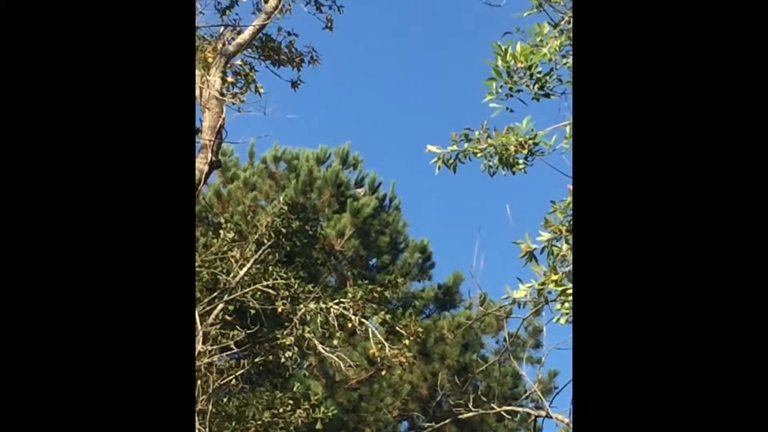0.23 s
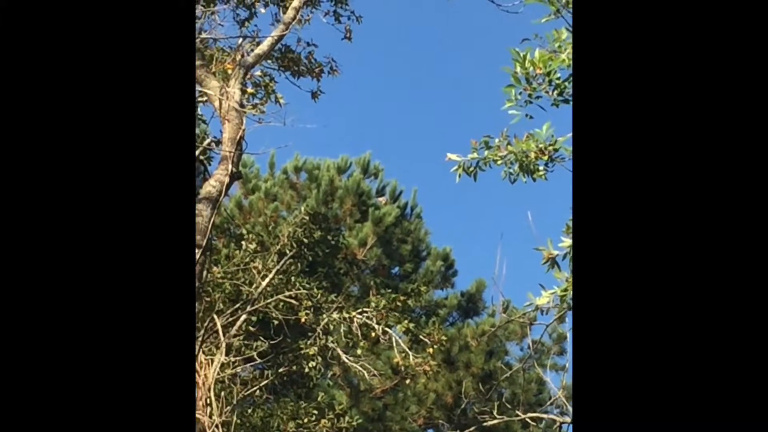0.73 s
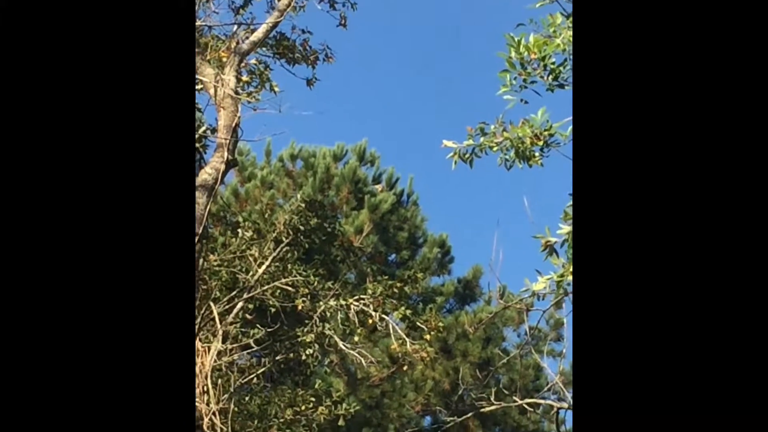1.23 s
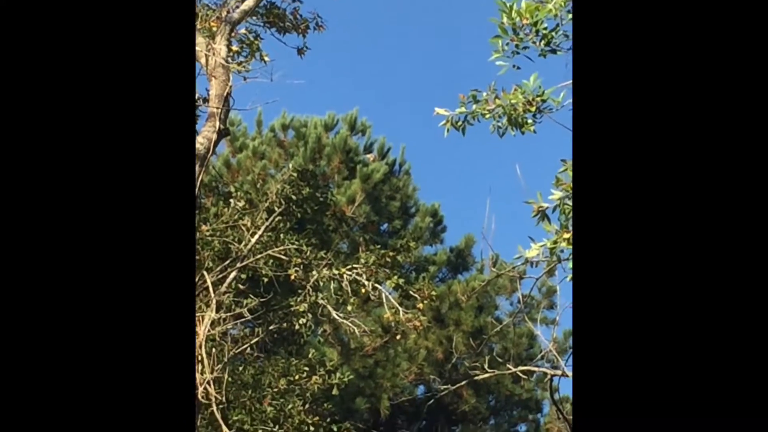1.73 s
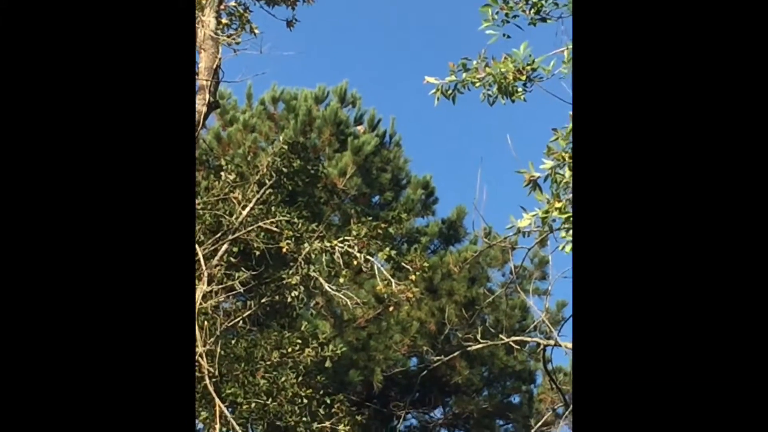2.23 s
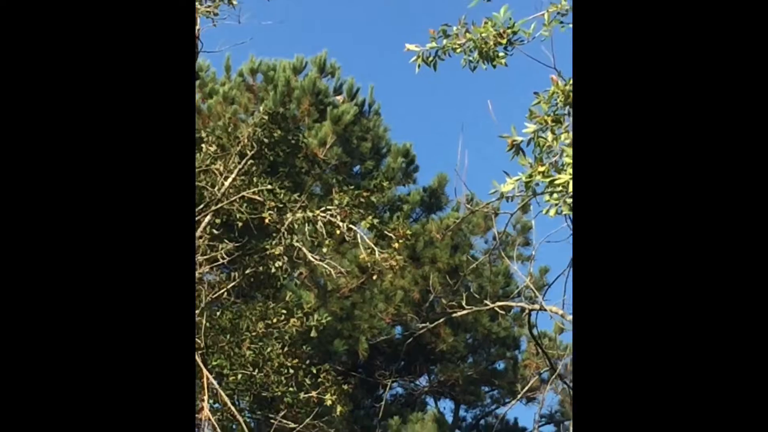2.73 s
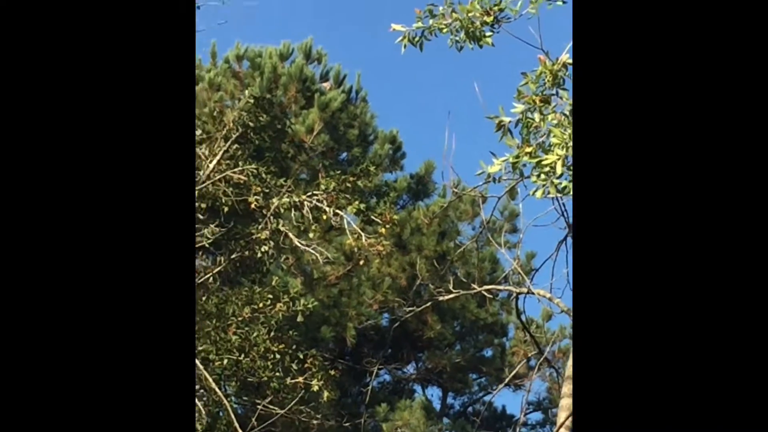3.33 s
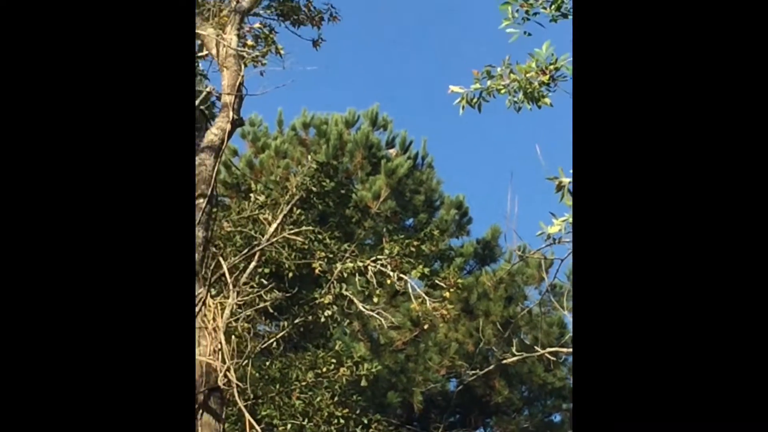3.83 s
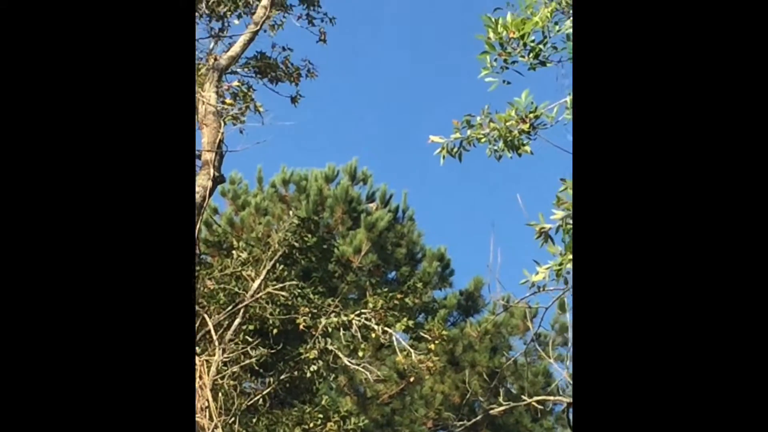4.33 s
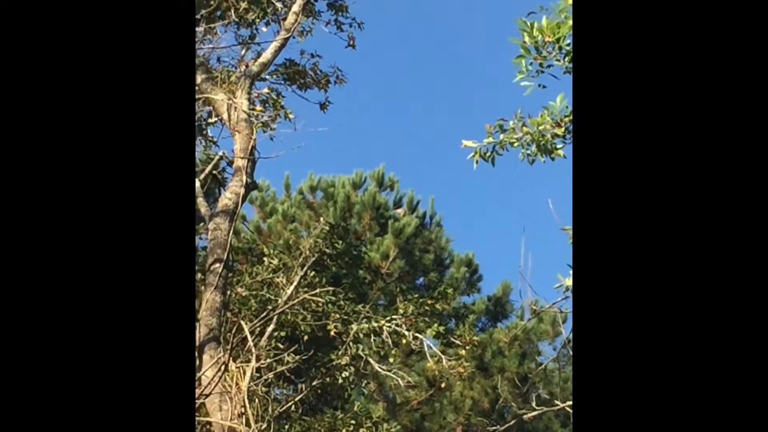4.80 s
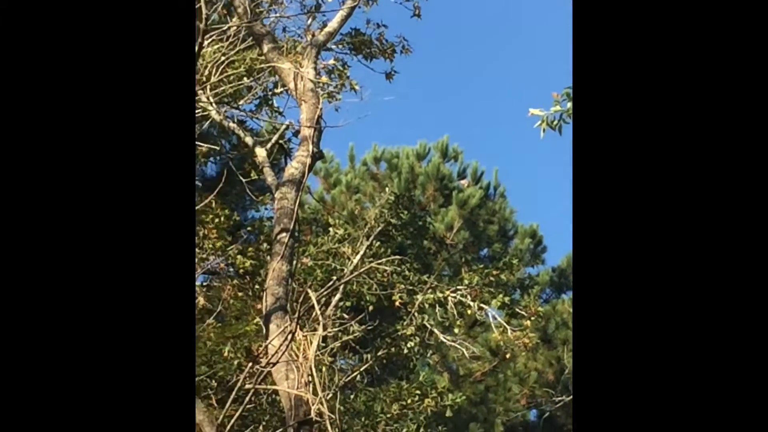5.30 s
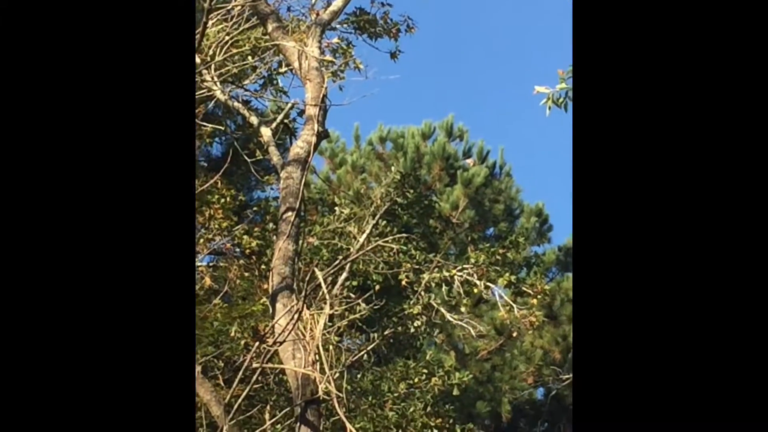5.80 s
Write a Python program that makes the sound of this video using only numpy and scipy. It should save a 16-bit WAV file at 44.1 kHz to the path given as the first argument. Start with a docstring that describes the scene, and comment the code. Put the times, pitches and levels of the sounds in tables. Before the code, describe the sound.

Loud, nasal, hoarse bird screams repeat at roughly two-thirds-second intervals, then more widely spaced near the end, eight in all. Some break suddenly from a higher to a lower pitch. Echoes scatter through the woods between calls, and distant calls of the same kind reply weakly. Close at the microphone are low wind-like rumble, muffled handling thuds from the middle on, and tiny metallic ticks over constant quiet outdoor air.

```python
"""Blue jay jeering from a tree

A blue jay jeers eight times: harmonics scoop up, step down, sag and drop away, some with a break in pitch.
Reflections and scattered echoes from trunks and foliage colour the calls; other jays answer from far off.
Behind them is steady outdoor noise. Close to the hand-held microphone: low rumble and finger rubs of
shaped noise, soft bumps of decaying sines and a faint two-mode tick once a second."""
import sys
import numpy as np
from scipy import signal
from scipy.fft import rfft, irfft
from scipy.io import wavfile
from scipy.ndimage import uniform_filter1d, map_coordinates

SR = 44100
rng = np.random.default_rng(int(sys.argv[2]) if len(sys.argv) > 2 else 0)


def digitize_waveform(pressure):
    """Quantize a signal to 16-bit integers and store it at the path in sys.argv[1].

    Rows of a 2-D input are taken as channels; values are limited to [-1, 1].
    """
    field = np.atleast_2d(pressure).T
    bounded = np.clip(field, -1, 1)
    quanta = np.round(bounded * 32767).astype(np.int16)
    wavfile.write(sys.argv[1], SR, quanta)


N = 267069


def undb(db):
    """Decibels to gain."""
    return 10 ** (np.asarray(db) / 20)


def unit(x):
    """Scale to rms 1."""
    return x / np.sqrt(np.mean(x ** 2))


def curves(table, x):
    """Columns of a table interpolated at x, which runs along its first column."""
    knots, *columns = np.transpose(table)
    return [np.interp(x, knots, column) for column in columns]


def response(points, hz):
    """Gain of a (frequency [Hz], level [dB]) spectrum, interpolated over log frequency."""
    knots_hz, db = np.transpose(points)
    return undb(np.interp(np.log(np.maximum(hz, 1)), np.log(knots_hz), db))


def band(x, lo_hz, hi_hz, order=2):
    """Butterworth band-pass."""
    sos = signal.butter(order, [lo_hz, min(hi_hz, SR / 2 - 1)], "band", fs=SR, output="sos")
    return signal.sosfilt(sos, x)


def noise(points):
    """Gaussian noise of a given spectrum, rms 1."""
    hz = np.arange(N // 2 + 1) * SR / N
    return unit(irfft(rfft(rng.standard_normal(N)) * response(points, hz), N))


def wander(rate_hz):
    """Smooth random motion, mostly below rate_hz, rms 1."""
    hz = np.arange(N // 2 + 1) * SR / N
    return unit(irfft(rfft(rng.standard_normal(N)) / (1 + (hz / rate_hz) ** 2), N))


def add(out, start_s, x):
    """Mix x into out from a start time."""
    i = max(int(start_s * SR), 0)
    out[i:i + len(x)] += x[:len(out) - i]


def air():
    """Outdoor background: shaped noise at a nearly constant level."""
    # noise spectrum: (frequency [Hz], relative level per Hz [dB])
    air_spectrum = [(25, -25), (60, 3), (90, -2), (250, -14.5), (630, -24.5), (1000, -21.5), (2000, -21.5),
                    (2800, -29), (3900, -36.5), (5300, -35), (8000, -41), (10400, -43), (12000, -44),
                    (15500, -45.5)]
    return noise(air_spectrum) * undb(-55.5 + 0.14 * wander(0.59))


def rubbing():
    """Strength of the rubbing: a steady grip plus a swell each time the fingers shift."""
    grip_db = -68  # relative, as the swells
    # finger shifts on the case: (centre [s], length [s], relative peak level [dB])
    shifts = [(0.514, 0.047, -55), (2.394, 0.085, -51), (2.524, 0.13, -49.5), (2.977, 0.069, -52.5),
              (3.499, 0.047, -40.5), (3.628, 0.06, -45), (3.807, 0.13, -52), (3.86, 0.013, -43),
              (4.05, 0.088, -54.5), (4.647, 0.03, -45.5), (5.2, 0.054, -49), (5.304, 0.056, -51.5),
              (5.736, 0.064, -49), (5.84, 0.072, -46.5)]
    t = np.arange(N) / SR
    strength = undb(grip_db)
    for centre_s, length_s, db in shifts:
        strength = strength + undb(db) * np.exp(-(2 * (t - centre_s) / length_s) ** 2)
    return strength


def bumps():
    """Soft bumps: each sine swells and dies within about two swings of the microphone's body."""
    # bumps of the hand: (start [s], envelope peak [dB], pitch [Hz])
    hits = [(3.352, -33.5, 99), (3.466, -32, 95), (3.635, -34.5, 72.5), (3.744, -35, 126), (3.86, -33, 232),
            (3.897, -30.5, 100.8), (4.893, -30.5, 82), (4.947, -32.5, 66), (5.036, -33, 75),
            (5.204, -32, 82), (5.744, -30, 86), (5.852, -30.5, 95.5)]
    out, t = np.zeros(N), np.arange(SR // 10) / SR
    for start_s, db, hz in hits:
        swell = t * hz / 0.5  # envelope peaks after half a cycle
        envelope = swell ** 2 * np.exp(2 * (1 - swell))
        add(out, start_s, undb(db) * envelope * np.sin(2 * np.pi * hz * t))
    return out


def handling():
    """Uneven low rumble of air, the rub of fingers on the case and bumps of the hand."""
    # rumble at the microphone: (time [s], relative level [dB])
    rumble_levels = [(0.0, -50), (0.8, -52.5), (1.6, -51.5), (2.6, -49.5), (3.15, -51.5), (3.4, -44),
                     (4.0, -45.5), (4.45, -49), (5.2, -47), (6.05, -54)]
    rumble_db, = curves(rumble_levels, np.arange(N) / SR)
    rumble = noise([(25, -38.5), (45, -7), (70, 0), (120, -2.5), (170, -10.5), (260, -11.5), (400, -28.5),
                    (800, -73)])
    rumble = rumble * undb(rumble_db - 2.0 + 3.96 * wander(5.6))
    rub = noise([(150, -39.0), (300, 4.0), (540, 11.5), (640, -5.5), (800, -6.5), (2000, -74.0)])
    rub = rub * rubbing() * undb(-8.0 + 3.25 * wander(44))
    return rumble + rub + bumps()


def ticks(ring_hz=7900, decay_s=0.0003, upper_hz=13500, upper_db=-19):
    """Tiny metal clicks, as of a wristwatch: two modes under one very short envelope."""
    # ticks: (start [s], envelope peak [dB])
    clicks = [(0.102, -48), (1.105, -46), (2.1082, -45), (3.1118, -47), (4.115, -47.5), (5.118, -46)]
    out, t = np.zeros(N), np.arange(SR // 100) / SR
    ring = np.sin(2 * np.pi * ring_hz * t) + undb(upper_db) * np.sin(2 * np.pi * upper_hz * t)
    envelope = t / decay_s * np.exp(1 - t / decay_s)
    for start_s, db in clicks:
        add(out, start_s, undb(db) * ring * envelope)
    return out


def jay(calls, jitter=0.0022, scoop_jitter=.036, scoop_s=0.044, shimmer_db=0.65, flutter_db=2.5,
        third_flutter_db=1.5, hiss_db=-39, scoop_hiss_db=-5, hiss_fade_s=.022, attack_s=0.022,
        release_s=0.0023, waver=0.0023, fundamental_db=-2.5, count=10):
    """Syrinx: harmonics slide through the throat resonances, hoarse until the voice settles.

    Rows of a call: (time [s], pitch [Hz], level, third harmonic, higher overtones [relative dB])."""
    # throat and open beak: (frequency [Hz], relative level [dB])
    throat = [(600, -30), (900, -14.5), (1250, -16.5), (1450, -8.5), (1800, -0.5), (2100, -2), (2600, -9.5),
              (2900, -4.5), (3200, -19.5), (3700, -37.5), (4900, -25.5), (6900, -31), (8300, -49.5),
              (12500, -57)]
    out = np.zeros(N)
    shake, shimmer, soft_noise = wander(350), wander(90), noise(throat)
    drift = waver * wander(22)
    flutter = np.array([wander(25) for _ in range(count)])
    k = np.arange(1, count + 1)[:, None]
    for call in calls:
        start_s, end_s = call[0][0], call[-1][0]
        i = np.arange(max(int((start_s - hiss_fade_s) * SR), 0), min(int(end_s * SR), N))
        t = i / SR
        age_s = t - start_s
        # the muscles need a few milliseconds, even at a break
        hz, db, third_db, edge_db = uniform_filter1d(np.array(curves(call, t)), size=SR // 220, axis=1)
        hoarse = np.exp(-(age_s / scoop_s) ** 2)

        # harmonic sizes relative to the second, which carries the call
        size = response(throat, k * hz) * undb(flutter_db * flutter[:, i])
        size = size / size[1]
        size[0] *= undb(fundamental_db)
        size[2] = undb(third_db + third_flutter_db * flutter[2, i])
        size[3:] *= undb(edge_db - 1) / np.linalg.norm(size[3:], axis=0)

        wobble = drift[i] + (jitter + scoop_jitter * hoarse) * shake[i]
        phase = 2 * np.pi * np.cumsum(hz * (1 + wobble)) / SR
        tone = np.sqrt(2) * (size * np.sin(k * phase)).sum(axis=0) * np.clip(age_s / attack_s, 0, 1)
        # soft noise fades in over hiss_fade_s ahead of the tone
        fade_in = np.clip(1 + age_s / hiss_fade_s, 0, 1)
        hiss = (undb(hiss_db) + undb(scoop_hiss_db) * hoarse) * soft_noise[i] * fade_in
        release = np.minimum((end_s - t) / release_s, 1)
        out[i] += (tone + hiss) * release * undb(db + shimmer_db * shimmer[i])
    return out


def woods(x, near_db, far_db, near_s=0.013, t60_s=0.68, branches_per_s=500, trunks_per_s=900):
    """Near branches return single quick echoes; further trunks return a long, dull tail of them."""
    # bands where the tail is stronger: (centre [Hz], width [Hz], gain of the added band [dB])
    lingering = [(1808, 90, 1.5), (2498, 220, 2.5)]
    t = np.arange(SR) / SR
    branches = rng.standard_normal(SR) * (rng.random(SR) < branches_per_s / SR)
    trunks = rng.standard_normal(SR) * (rng.random(SR) < trunks_per_s / SR)
    near = band(branches, 1100, 15000) * np.exp(-t / near_s) * np.minimum(t / 0.0017, 1)
    far = band(trunks, 630, 6400) * np.exp(-np.log(1000) * t / t60_s) * (1 - np.exp(-t / 0.0067))
    far = far + sum(undb(db) * band(far, hz - width_hz / 2, hz + width_hz / 2, order=1)
                    for hz, width_hz, db in lingering)
    middle = slice(1500, 2800)  # Hz; each path's rms gain here is set
    echoes = np.zeros(SR)
    for path, db in [(near, near_db), (far, far_db)]:
        echoes += undb(db) * path / np.sqrt(np.mean(abs(rfft(path)[middle]) ** 2))
    return x + signal.fftconvolve(x, echoes)[:N]


def answer(start_s, end_s, first_hz, last_hz, level_db):
    """Far call: only its loud middle carries, swelling and fading as it falls. Rows as for jay()."""
    end_fade_db, third_db, edge_db = -16.5, -35, -45
    u = np.linspace(0, 1, num=40)
    t = start_s + u * (end_s - start_s)
    hz = first_hz + u * (last_hz - first_hz)
    db = level_db + end_fade_db * (2 * u - 1) ** 2
    return np.column_stack(np.broadcast_arrays(t, hz, db, third_db, edge_db))


def far_jays():
    """Falling calls of distant jays, heard with strong echoes from the trees."""
    # calls: (start [s], end [s], first pitch [Hz], last pitch [Hz], relative level [dB])
    answers = [(1.81, 1.929, 1450, 1310, -51.5), (1.84, 1.922, 1075, 985, -55),
               (3.92, 4.0, 1335, 1260, -63), (5.831, 6.028, 1345, 1138, -51)]
    calls = jay([answer(*row) for row in answers], scoop_jitter=0.0098, scoop_hiss_db=-27.5)
    return woods(calls, near_db=0, far_db=-13.5)


def ground(x):
    """Close reflections add to the call and cancel it in turn, so sliding harmonics swell and fade."""
    # ground and close surfaces: (delay [ms], gain [linear])
    reflections = [(3.414, .08), (4.604, .12), (6.76, .09), (7.208, .39), (7.436, .38), (7.872, .11),
                   (15.339, .09)]
    return x + sum(gain * map_coordinates(x, [np.arange(N) - delay_ms * SR / 1000], order=1)
                   for delay_ms, gain in reflections)


def jeer(start_s, crest_s, step_at_s, end_s, step_s, crest_hz, before_hz, after_hz, last_hz, bow_hz,
         level_db, overtone_db):
    """Scoop to the high register, step to the low one, sag and drop. Rows as for jay()."""
    # voice against pitch: (pitch [Hz], second harmonic [relative dB],
    # third harmonic re second [dB], higher overtones re second [relative dB])
    voice = [(605, -62.5, 23.5, -12), (733, -52, 8, -7.5), (813, -42, -4, -20), (852, -39.5, -4, -33),
             (894, -43.5, -5.5, -22), (948, -38, -11, -27.5), (1031, -33, -28, -29),
             (1133, -35.5, -21.5, -20.5), (1360, -38, -35.5, -17)]
    scoop_hz, scoop_shape = 698.8, .88  # shape under 1 climbs fastest at first
    drop_s, drop_share, drop_shape = .06, .32, 2.2  # final fall by this share, ever faster
    scoop_edge_db, step_edge_db, break_s = 8.5, -8.5, 0.0077  # overtones flare in scoop, falter at step

    t = np.linspace(start_s, end_s, num=400)
    climb = np.clip((t - start_s) / (crest_s - start_s), 0, 1) ** scoop_shape
    stepped = .5 + .5 * np.tanh(2 * (t - step_at_s) / step_s)
    sag = np.clip((t - step_at_s) / (end_s - drop_s - step_at_s), 0, 1)
    drop = np.clip(1 - (end_s - t) / drop_s, 0, 1) ** drop_shape
    high_hz = np.interp(t, [crest_s, step_at_s], [crest_hz, before_hz])
    low_hz = after_hz + sag * (last_hz - after_hz) + bow_hz * np.sin(np.pi * sag)
    register_hz = high_hz + stepped * (low_hz - high_hz)
    hz = (scoop_hz + climb * (register_hz - scoop_hz)) * (1 - drop_share * drop)

    db, third_db, edge_db = curves(voice, hz)
    # gradual steps falter less
    falter = np.exp(-((t - step_at_s) / break_s) ** 2) * min(break_s / step_s, 1)
    edge_db = edge_db + overtone_db + scoop_edge_db * (1 - climb) + step_edge_db * falter
    return np.column_stack([t, hz, db + level_db, third_db, edge_db])


def near_jay():
    """The main jay: eight jeers with close reflections and echoes from the trees."""
    # jeers: (start [s], crest [s], step down [s], end [s], step length [s], pitch at crest [Hz],
    # before step [Hz], after step [Hz], before final drop [Hz], upward bow of the sag [Hz],
    # relative level [dB], relative overtone level [dB])
    jeers = [(-0.035, 0.018, 0.102, 0.399, .003, 1254, 1218, 964, 856, -10, 0, 0),
             (0.587, 0.642, 0.688, 1.003, .025, 1122, 1095, 1016, 873, 3, 0, 1),
             (1.221, 1.279, 1.328, 1.641, .03, 1150, 1108, 1046, 915, 4, 0, 0),
             (1.929, 1.99, 2.053, 2.374, .04, 1178, 1140, 1058, 893, -3, 1, -1),
             (2.578, 2.643, 2.745, 3.018, .003, 1302, 1188, 998, 895, -6, .5, -2),
             (3.228, 3.296, 3.382, 3.67, .003, 1312, 1190, 1014, 904, 1, .5, -1),
             (4.188, 4.268, 4.384, 4.735, .003, 1300, 1200, 1005, 886, 7, -1.7, 2),
             (5.06, 5.126, 5.198, 5.55, .022, 1150, 1165, 1038, 884, 12, -1, 0)]
    calls = jay([jeer(*row) for row in jeers])
    return woods(ground(calls), near_db=-14, far_db=-9.0)


def scene():
    """Background, sounds at the microphone, far jays and the near jay, summed."""
    jays = undb(-5.0) * far_jays() + undb(-0.06) * near_jay()
    return (air() + handling() + ticks() + jays)[None]


def record(dry):
    """The microphone thins the deep bass and the recorder cuts the top."""
    bass_hz, top_hz = 36, 15700
    thin = signal.sosfilt(signal.butter(3, bass_hz, "high", fs=SR, output="sos"), dry)
    # 0.2 dB ripple, 70 dB stop band
    return signal.sosfilt(signal.ellip(10, .2, 70, top_hz, fs=SR, output="sos"), thin)


dry = scene()
out = record(dry)
digitize_waveform(out)
```